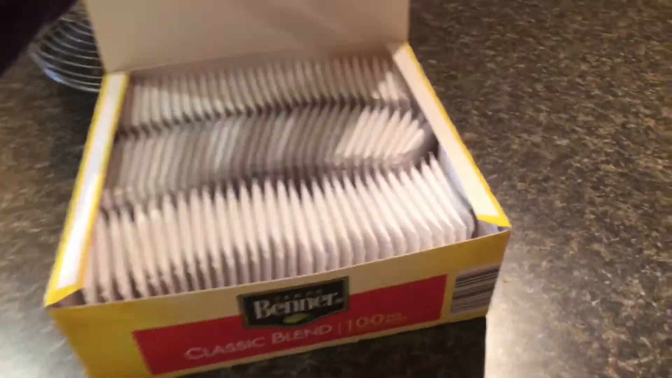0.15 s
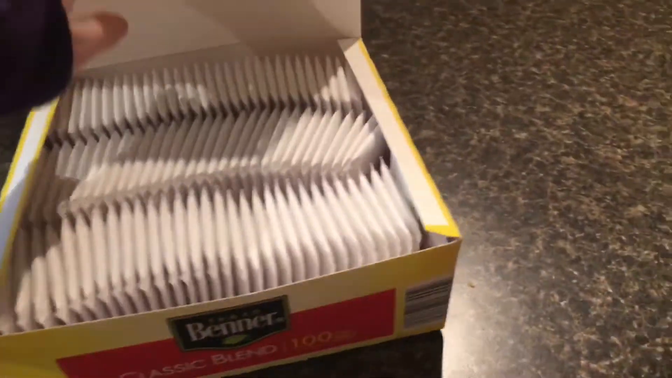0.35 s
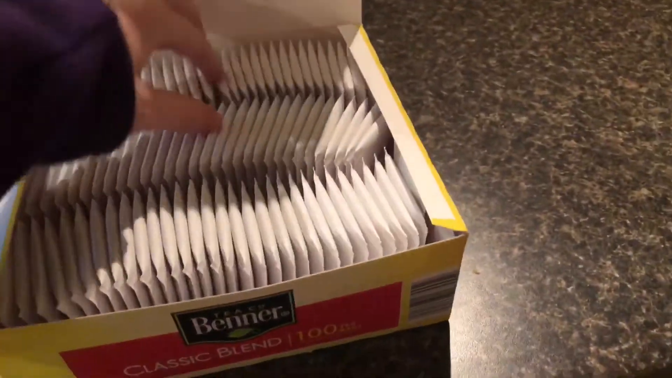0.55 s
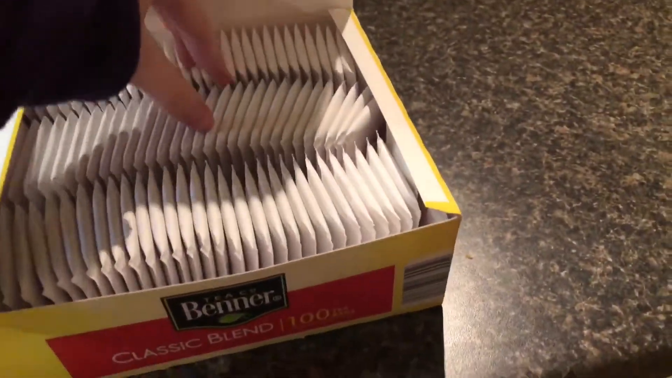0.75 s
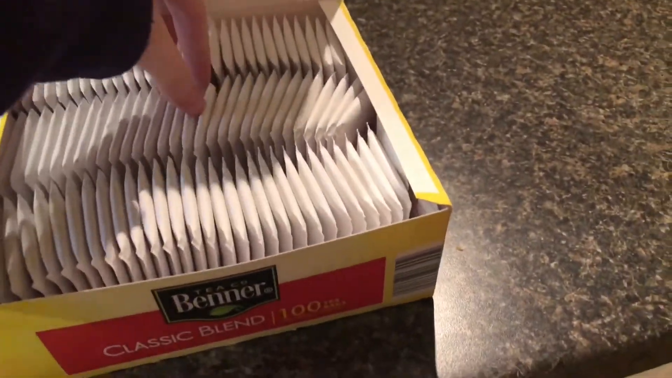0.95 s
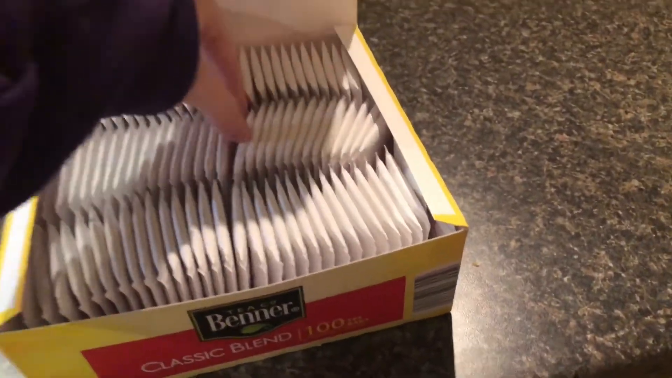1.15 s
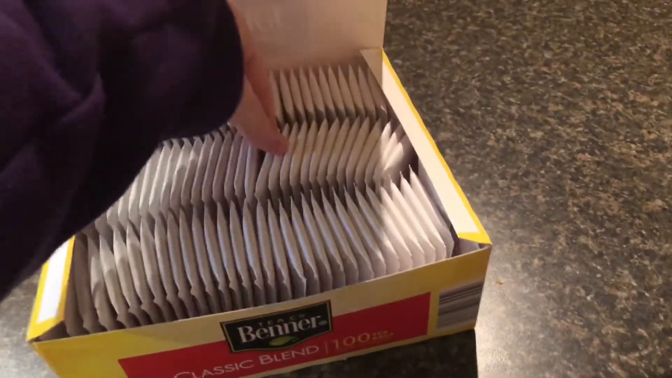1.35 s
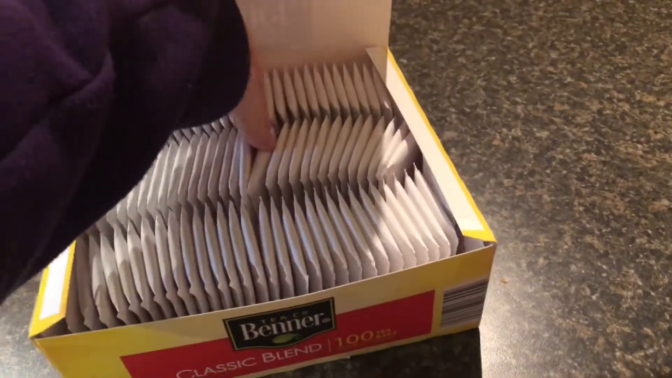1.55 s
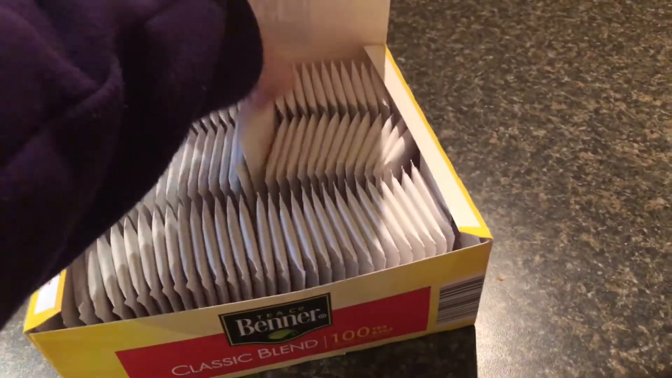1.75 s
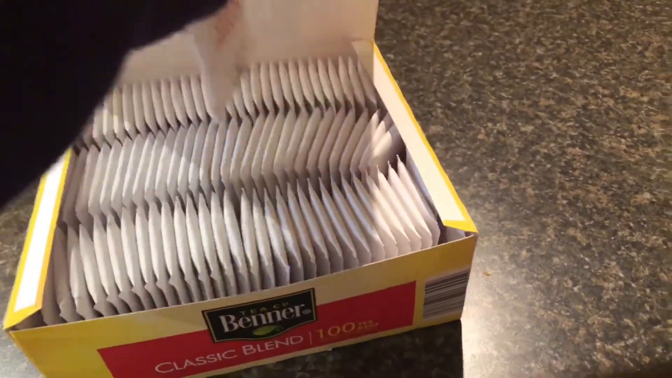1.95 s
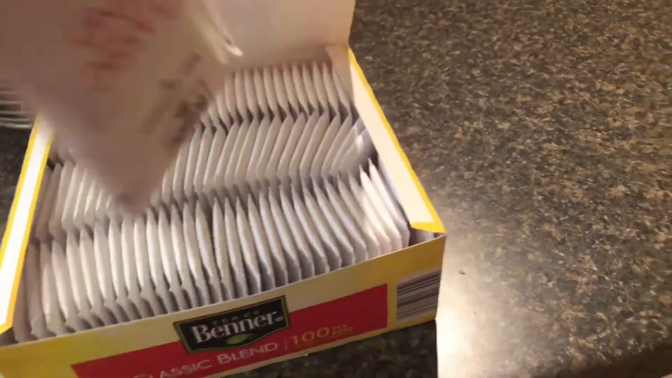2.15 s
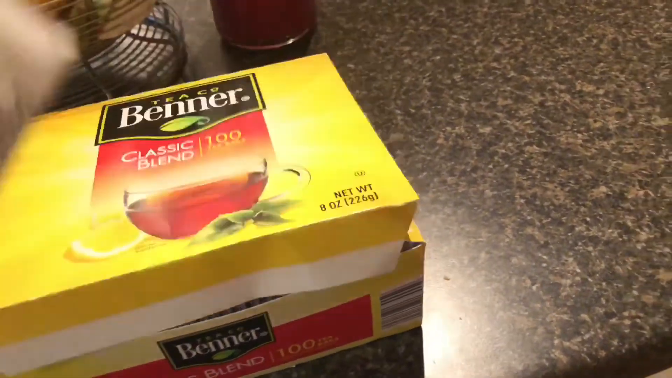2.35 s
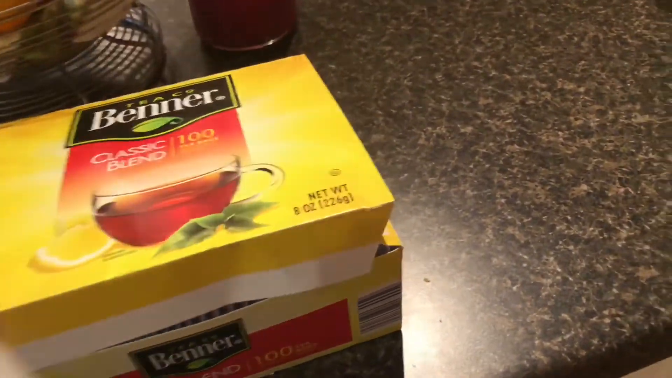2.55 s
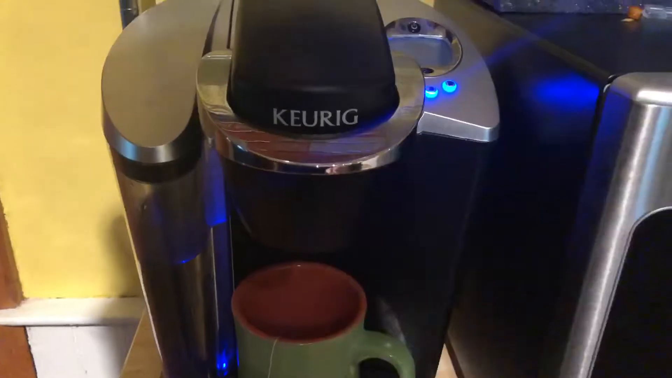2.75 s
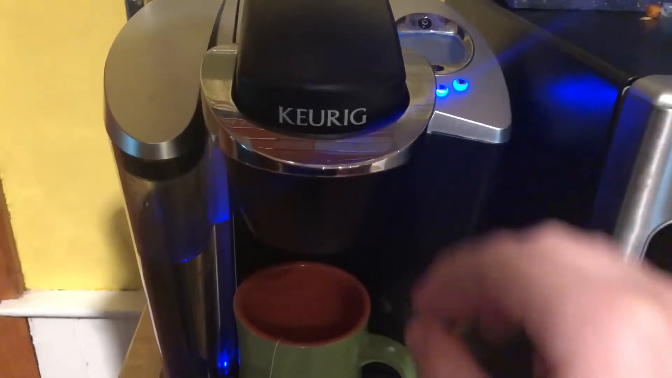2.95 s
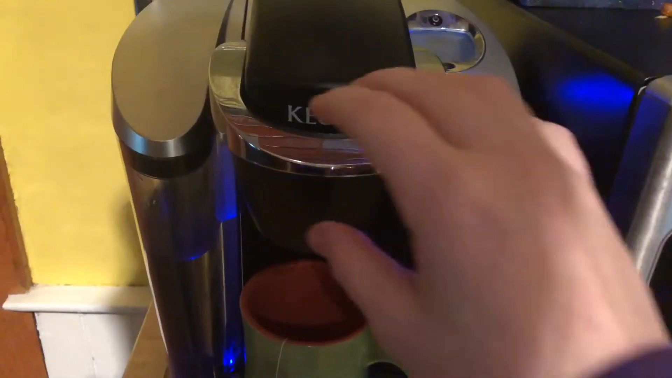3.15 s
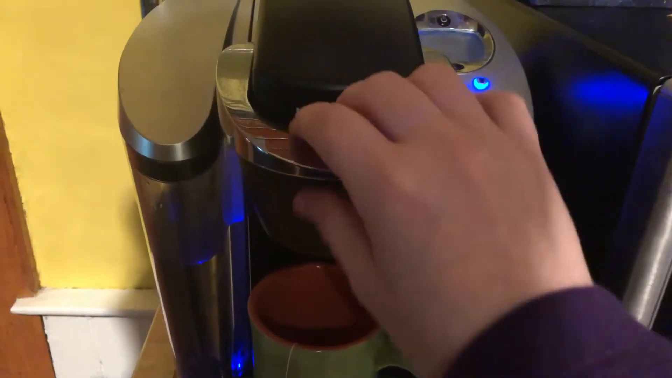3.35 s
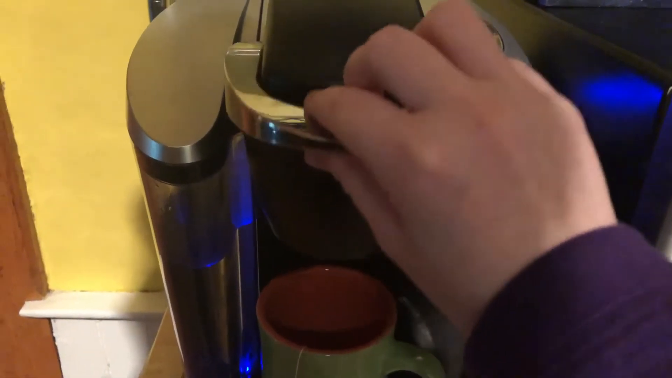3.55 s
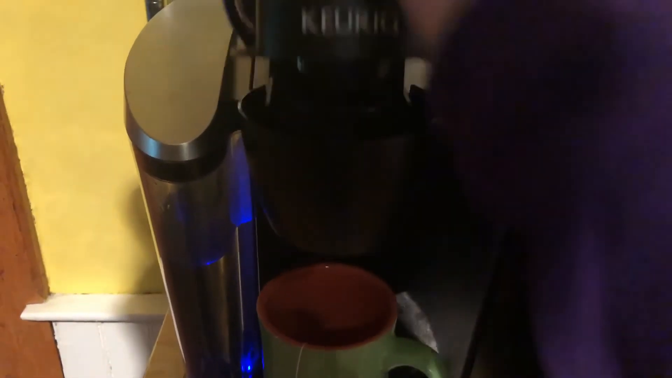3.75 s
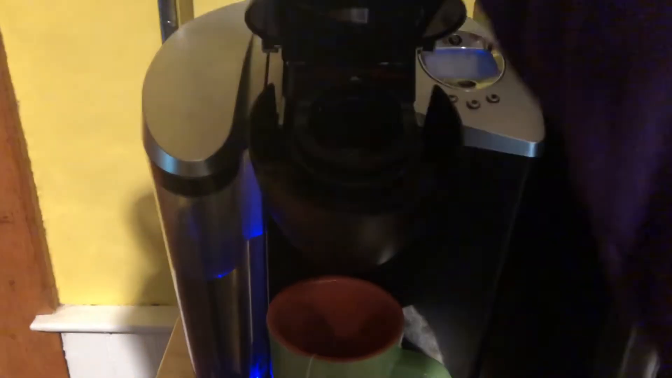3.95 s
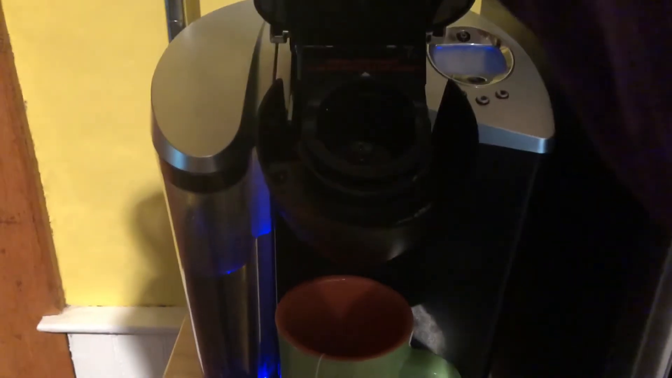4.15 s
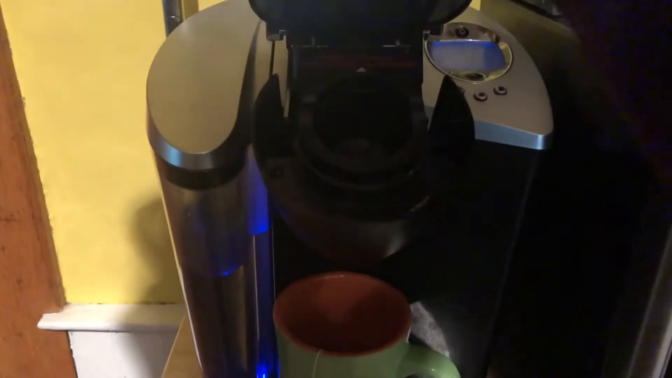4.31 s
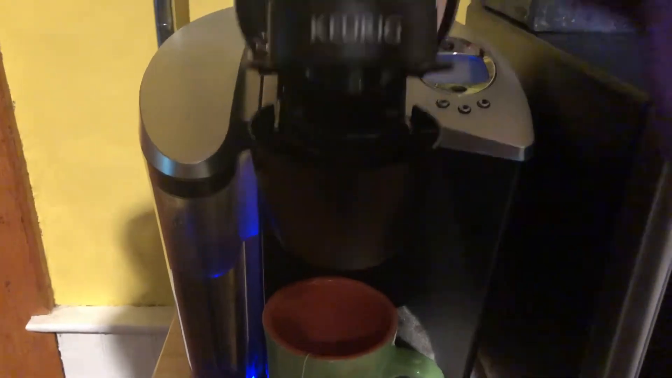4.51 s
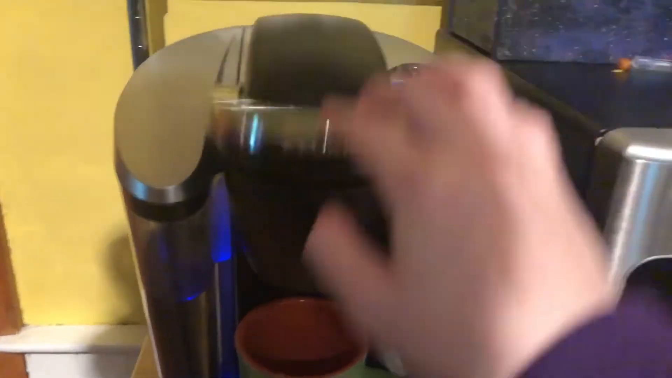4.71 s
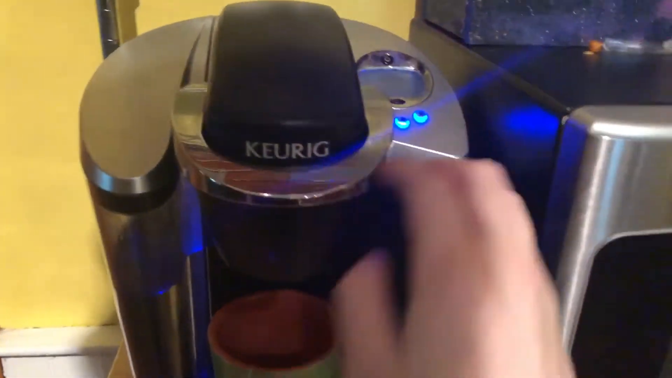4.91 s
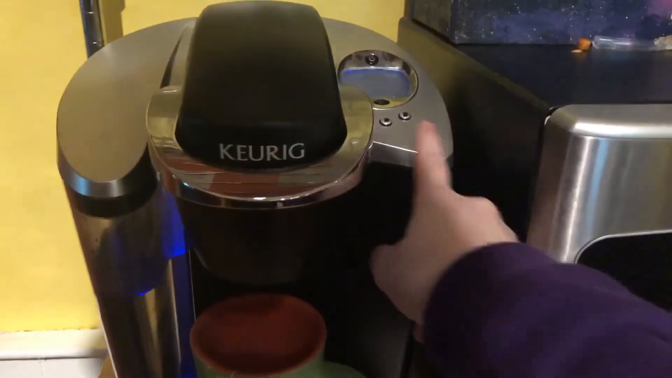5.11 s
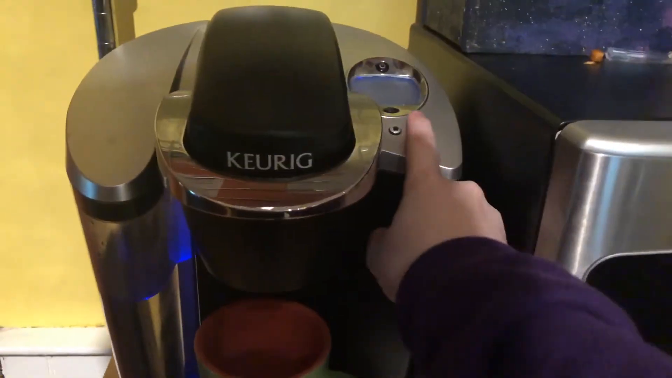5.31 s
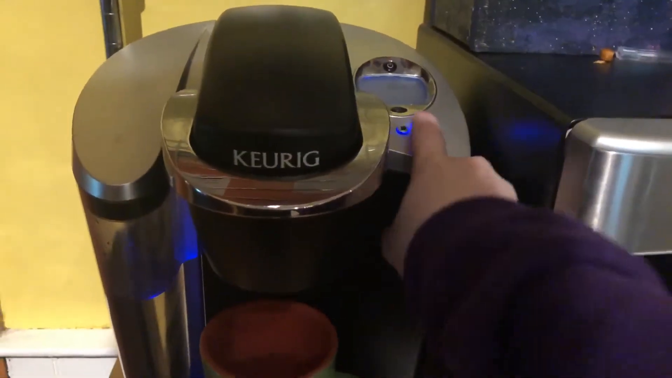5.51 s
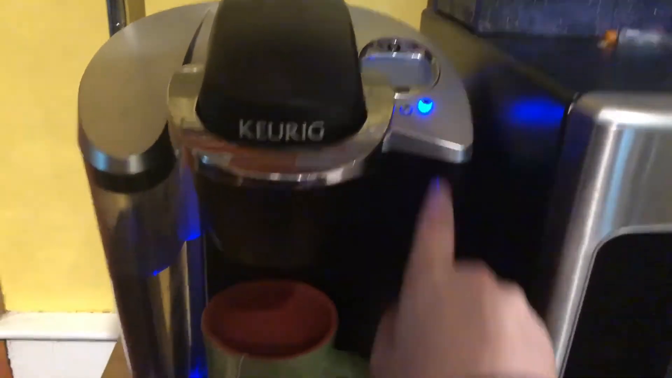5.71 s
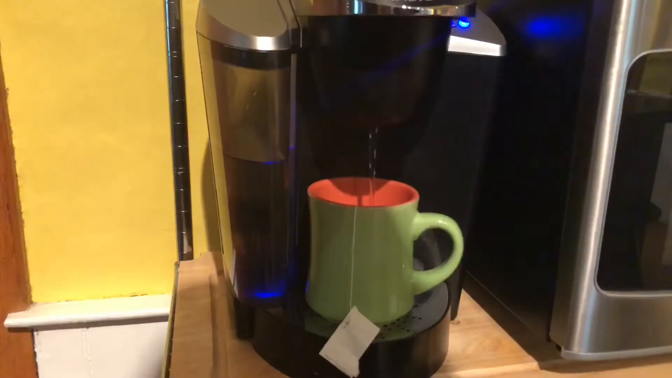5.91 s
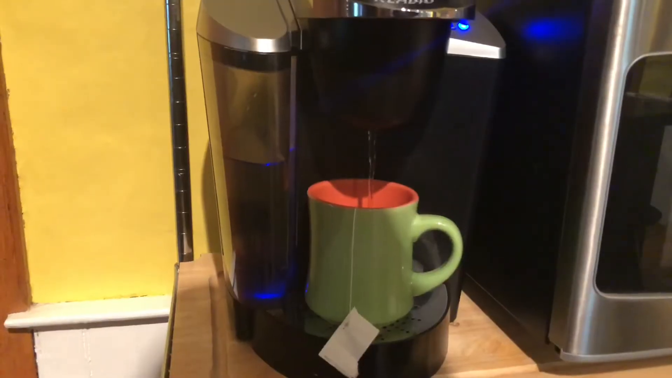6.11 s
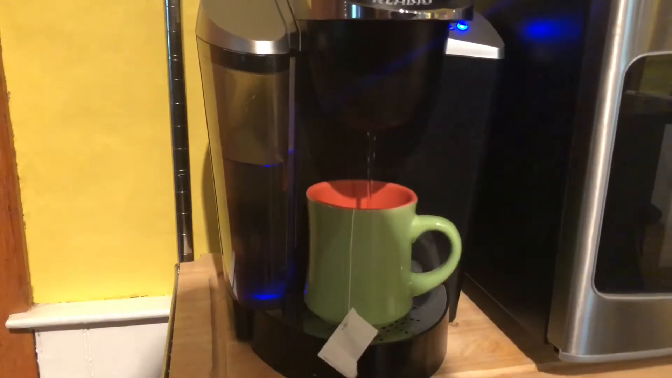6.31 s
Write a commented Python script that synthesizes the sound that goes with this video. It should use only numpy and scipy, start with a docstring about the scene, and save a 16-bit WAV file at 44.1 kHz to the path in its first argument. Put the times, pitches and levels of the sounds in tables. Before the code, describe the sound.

Fingers rustle crisply through paper tea bags in a card box, then a plastic coffee brewer clatters and slams shut, and water dribbles into a mug.

```python
"""In a kitchen, heard close up, fingers leaf through paper tea bags in a card box, pull one out and shut the lid.
After a cut, a plastic brewer's handle is lifted, lowered and slammed and a button pressed;
after a second cut, water dribbles into a mug while the pump hums.
Noise bursts and rubbing noise excite the resonances of box and brewer; drops are noise ticks and short sines.
Soft bumps, a short kitchen echo and steady air with appliance bands complete the sound."""
import sys
import numpy as np
from scipy import signal
from scipy.fft import rfft, irfft, next_fast_len
from scipy.io import wavfile
from scipy.ndimage import uniform_filter1d, map_coordinates

SR = 44100
rng = np.random.default_rng(int(sys.argv[2]) if len(sys.argv) > 2 else 0)


def generate_wav(signal):
    """Clip the signal to [-1, 1] and save it as 16-bit WAV at the path in sys.argv[1]."""
    frames = np.transpose(np.atleast_2d(signal))
    scaled = np.clip(frames, -1, 1) * 32767
    pcm = np.round(scaled).astype(np.int16)
    wavfile.write(sys.argv[1], SR, pcm)


N = 280917  # length in samples

# strokes of fingers on paper: start_s, length_s, rise_s, hiss_db, flap_hz, scrape_db, scrape_hz
PAPER_STROKES = [(0.186, 0.05, .008, -67, 5000, -72, 1500), (0.226, 0.12, 0.044, -54, 4440, -56, 1200),
                 (0.343, 0.19, 0.03, -53.5, 5070, -54.5, 1580), (0.5, .17, 0.043, -50, 4300, -46.5, 1760),
                 (0.675, 0.093, 0.024, -53.5, 4970, -62, 1480),
                 (0.777, 0.095, 0.045, -50, 5130, -52.5, 1300), (0.911, 0.074, 0.013, -53, 5500, -48, 2220),
                 (0.982, 0.091, 0.016, -50, 7200, -41, 890), (1.112, 0.067, 0.031, -52.5, 7200, -51.5, 720),
                 (1.163, 0.067, 0.056, -41, 7100, -48.5, 700), (1.255, 0.165, 0.0097, -55, 5700, -62, 1480),
                 (1.425, 0.072, .05, -49, 7700, -64, 1500), (1.511, 0.079, 0.013, -59, 7000, -65, 1500),
                 (1.573, .14, .04, -57.5, 3970, -59.5, 1630), (1.762, 0.23, 0.066, -43.5, 4330, -53, 2200),
                 (2.022, 0.043, 0.01, -51.5, 6000, -58, 1390), (2.095, 0.051, .008, -52.5, 3300, -42, 1300),
                 (2.32, 0.03, 0.0056, -58.5, 3930, -70, 2180)]
# the loudest paper snaps: start_s, peak_db, centre_hz
PAPER_SNAPS = [(0.7058, -38, 10200), (0.7423, -32, 4800), (0.9278, -40, 5500), (0.9455, -38, 8800),
               (1.0146, -17.5, 4700), (1.0331, -33, 6920), (1.1139, -19, 4040), (1.1506, -23, 6700),
               (1.1532, -26, 6150), (1.1729, -19, 6800), (1.1851, -21.5, 7000), (1.2145, -26, 7100),
               (1.232, -23, 6700), (1.2435, -22, 7400), (1.276, -31, 4630), (1.5508, -38, 4270),
               (1.594, -36.5, 4250), (1.975, -33, 6200), (2.0405, -32.5, 8130), (2.481, -37, 3850),
               (2.499, -37, 3520)]
# colour of the paper hiss: freq_hz, level_db (per Hz)
PAPER_COLOUR = [(530, -44.5), (900, 5), (1760, -7.5), (1910, -11), (2210, 1.5), (3270, 2), (4270, 1),
                (15200, -7.5), (15900, -10), (16500, -43.5)]
# card resonances under a finger: centre_hz, width_hz
CARD_SCRAPE = [(615, 350), (1410, 690), (1883, 590), (2280, 340)]
# resonances of the card box: centre_hz, width_hz, level_db
CARD_BOX = [(158, 23, -8), (236, 110, -1), (380.4, 37, 0.5), (475.7, 42, 0), (693, 61, 4), (950, 68, 0.5),
            (1172, 64, 0.5), (1336, 91, -1.5), (2340, 300, -10.5), (3030, 130, -21), (3550, 130, -15.5)]
# the box shifting: time_s, level_db
BOX_SWAY = [(0.0, -57), (0.19, -61.5), (0.49, -54), (0.83, -54.5), (1.19, -56), (1.53, -56), (1.75, -60.5),
            (2.08, -51), (2.27, -72.5), (2.44, -55.5)]
# knocks on the box: start_s, crack_db, knock_db, thump_db, crack_tilt_db (per octave, high in the treble)
BOX_KNOCKS = [(0.3253, -25.5, -22.5, -30, 4), (1.9834, -59, -66, -37, 0), (2.0574, -43, -34, -44, 0),
              (2.1077, -32, -42, -33, 6), (2.1263, -44, -46, -32, 23), (2.1396, -43, -38, -32, 5),
              (2.4441, -11, -6.5, -20, 3.5), (2.4502, -32.5, -11, -13, 5), (2.5372, -42, -22, -26, 0)]
# colour of the crack of a box knock: freq_hz, level_db (per Hz)
CARD_CRACK = [(880, -42.5), (1500, 3.5), (3000, -7), (3630, -1.5), (4300, -15.5), (5000, -10.5),
              (16500, -61.5)]
STROKE_STOP_S, REST_DB = 0.0098, -67  # dying-away time constant; faint rustle while the hand stays in the box
CRACKLES, CRACKLE_DB = 220, 7  # count of small chance snaps; typical peak over the hiss of the moment
CARD_CONTACT_S, PLASTIC_CONTACT_S = 0.0048, 0.008  # length scale of the chatter in a blow

# handle, hinge and fingers sliding: start_s, length_s, rise_s, hiss_db, rub_db
HANDLE_MOVES = [(3.324, 0.047, .02, -66, -69), (3.501, 0.043, .01, -46.5, -44),
                (3.591, 0.031, .01, -52, -47.5), (3.7, 0.029, .01, -72, -40),
                (3.763, 0.067, .02, -52, -46.5), (3.839, 0.057, .02, -47, -40.5),
                (3.89, 0.13, .02, -56.5, -46.5), (3.997, 0.23, .02, -75, -56), (4.237, 0.02, .02, -65, -57),
                (4.419, 0.16, .11, -44, -43.5), (4.59, 0.089, .01, -60, -46),
                (4.707, 0.31, .05, -65, -44.5), (5.155, 0.034, .005, -62.5, -52),
                (5.381, 0.14, .03, -87, -68), (5.652, 0.041, .015, -69, -63)]
# plastic contacts: start_s, crack_db, knock_db, thump_db, crack_tilt_db (per octave, high in the treble)
PLASTIC_CLACKS = [(3.5121, -28, -27.5, -38.5, 6), (3.535, -29, -40, -31, 11), (3.5496, -33, -46, -41, 0),
                  (3.5902, -34, -34, -39, -0.5), (3.6025, -29, -52, -29, 3), (3.6183, -24.5, -48, -48, 1.5),
                  (3.695, -27.5, -57, -59, 8.5), (3.792, -29, -26, -39, 2), (3.8445, -32, -40, -51, -6),
                  (3.8596, -28.5, -43, -50, -6.5), (3.8803, -22, -50, -57, -5), (3.8946, -26, -47, -28, -6),
                  (3.9962, -14.5, -19.5, -28, 3), (4.093, -36, -33, -66, -5), (4.1682, -45, -49, -44, -4),
                  (4.2087, -18, -16, -29, 9), (4.252, -24, -42, -30, -1.5), (4.266, -23, -27, -30, 10),
                  (4.2758, -23.5, -24, -26, 4.5), (4.3019, -22, -17, -23, -2),
                  (4.558, -28, -44.5, -43.5, -2), (4.5812, -35, -29.5, -41, -3.5),
                  (4.6193, -30.5, -41, -51.5, -10), (4.6456, -18, -23, -38, 2),
                  (4.6507, -15.5, -26, -25.5, -1), (4.7671, -24.5, -27, -49, 3.5),
                  (4.8221, -32.5, -43, -46, 1), (4.8335, -2.5, -3.5, -15.5, 0),
                  (4.8375, -9, -7.5, -12.5, 1), (4.8433, -15, -7.5, -9.5, -5), (4.876, -40.5, -27, -20, 0),
                  (5.1546, -29.5, -36.5, -46, 9), (5.32, -50, -44, -57, 2), (5.3518, -16, -19.5, -25, 14.5),
                  (5.459, -38, -27, -30, 4), (5.498, -38.5, -34, -37.5, 4.5),
                  (5.6507, -32, -42, -54, -12.5)]
# colour of the plastic crack: freq_hz, level_db (per Hz)
PLASTIC_CRACK = [(1180, -9.5), (2000, -2.5), (4350, -5.5), (5870, -11), (6470, -10.5), (12000, -19),
                 (13200, -20.5), (15500, -23), (16500, -19)]
# resonances of the brewer housing: centre_hz, width_hz, level_db
BREWER_SHELL = [(147, 28, -2.5), (186.4, 16, 1), (242, 30.6, 6), (356, 75, -4.5), (482, 106, -3),
                (731, 43, 0), (1053, 250, 0), (1392, 94, 2), (1610, 110, 0), (2015, 23, -1.5),
                (2320, 170, -1), (3116, 72, -8.5), (4500, 260, -10)]
# the hollow body booming under the hand: time_s, level_db
HOUSING_BOOM = [(3.35, -55.5), (3.45, -61), (3.55, -50), (3.68, -50), (3.96, -40), (4.17, -49),
                (4.33, -54.5), (4.61, -47), (4.85, -42), (5.04, -45), (5.16, -49), (5.54, -54), (5.7, -51)]
# mug and tray shaken by the housing: pitch_hz, level_db, t60_s
MUG_RINGS = [(1113, -4.5, 0.63), (1393, -2, 0.71), (1570, -12.5, .5), (1955, -1, 0.42)]
MOVE_STOP_S, MUG_DB = 0.01, -25.5  # dying-away time constant; peak of the mug relative to each knock
# hiss of the hinge: centre_hz, width_hz, level_db
HINGE_HISS = [(4070, 280, -4.0), (4250, 1500, 18), (5500, 400, -5.5), (6830, 900, -7.5), (11000, 6800, -14.0)]

# the clearest drops into the mug: start_s, splash_db, splash_hz, cavity_db
MUG_DROPS = [(5.8875, -52.5, 10900, -37.5), (5.9618, -49, 3120, -62), (5.9924, -61, 3090, -41.5),
             (6.0094, -59, 2620, -35), (6.0566, -46, 11300, -62.5), (6.1324, -61, 3000, -35.5),
             (6.146, -48, 4400, -38.5), (6.1719, -33.5, 8500, -26.5), (6.1874, -35.5, 10300, -27),
             (6.2144, -57, 9700, -37), (6.2682, -41.5, 3000, -43), (6.2836, -38, 8850, -35),
             (6.2924, -45, 4180, -33), (6.336, -43.5, 4200, -37), (6.3404, -40.5, 2930, -27),
             (6.3524, -49, 4100, -58)]
# colour of pump and trickle: freq_hz, level_db (per Hz)
STREAM_COLOUR = [(24, -32), (40, 8), (102, -23), (206, -1), (427, -8.5), (981, -3.5), (1330, -17),
                 (1580, -7), (2200, -24), (2970, -27), (6020, -35), (15300, -46), (16500, -46)]
STREAM_DB = -52  # rms
CAVITY_HZ, CAVITY_SCATTER = 898, 0.046  # air in the mug; share it varies from drop to drop
DROPLETS, DROPLET_DB, DROPLET_HZ = 24, -54, 3310  # small chance drops: count, typical level and splash pitch

# soft bumps of the hands through the worktop: start_s, peak_db, pitch_hz, t60_s
HAND_BUMPS = [(0.301, -40.5, 108, 0.26), (0.324, -33.5, 109, 0.14), (1.43, -48.5, 77.4, 0.14),
              (2.008, -42.5, 62, 0.12), (2.129, -49, 88, 0.083), (2.16, -42.5, 114, 0.15),
              (2.467, -36.5, 67, 0.14), (3.998, -42.5, 104, 0.26), (4.889, -34.5, 109.8, 0.1),
              (4.968, -41.5, 86.3, 0.15)]
# kitchen reverberation: freq_hz, t60_s
KITCHEN_DECAY = [(100, 1), (300, 0.34), (1000, 0.38), (3000, 0.51), (8000, 0.32), (15000, 0.29)]
ROOM_DB = -10, -10.5, -12.5  # kitchen echo sends of box, brewer, mug
BOX_ECHO_HZ = 2500  # the echo of the box is dull above this
# colour of the kitchen background: freq_hz, level_db (per Hz)
AIR_COLOUR = [(15, -29.5), (25, -29), (48, -1), (114, -9), (154, -2), (197, -4), (389, -9), (422, -8.5),
              (3060, -31), (3600, -30.5), (5570, -32.5), (7920, -36.5), (16500, -39.5)]
AIR_DB = -59  # rms, before a slow waver
# steady appliance bands: centre_hz, width_hz, level_db
APPLIANCE_BANDS = [(377.8, 12, -65), (1710, 33, -81.5), (3620, 110, -79.5), (7760, 400, -80.5)]
# joins between the scenes: time_s, fade_out_s, fade_in_s
SCENE_CUTS = [(2.8, 0.042, 0.04), (5.841, 0.03, 0.036)]
# response of the microphone: freq_hz, level_db
MICROPHONE_RESPONSE = [(20, -28.5), (35, -12), (55, -2.5), (15700, -1), (16100, -22.5), (16900, -31.5)]
TOP_HZ = 17000  # band limit of the microphone


def tea_bags():
    """Paper hisses and snaps, scrapes on card, and the box sways and knocks."""
    strokes = gestures(PAPER_STROKES, STROKE_STOP_S)
    hiss_db, flap_hz, scrape_db, scrape_hz = np.transpose(PAPER_STROKES)[3:]
    resting = amp(REST_DB) * during([PAPER_STROKES[1], PAPER_STROKES[-2]])
    hiss = amp(hiss_db) @ strokes + resting
    track = hiss * paper_hiss(flap_hz, strokes)
    track += amp(scrape_db) @ strokes * card_scrape(scrape_hz, strokes)
    sway = amp(curves(BOX_SWAY)[0]) * during(BOX_SWAY)
    track += sway * rubbing(modes(CARD_BOX, 0, 600), grain_db=3.5)
    add_snaps(track, hiss, flap_hz, strokes)
    return track + blows(BOX_KNOCKS, CARD_BOX, 550, CARD_CRACK, CARD_CONTACT_S)


def paper_hiss(flap_hz, strokes):
    """Broad friction noise plus the free flap, whose resonance moves as the fingers shorten it."""
    broad = rubbing(lambda hz: amp(along(PAPER_COLOUR, hz)) * hz ** 2 / (hz ** 2 + 3000 ** 2), grain_db=2.0)
    now = strokes.argmax(axis=0)  # the strongest stroke at each sample
    flaps = np.zeros(N)
    for centre_hz in (3300, 4500, 7200):
        nearness = np.exp(-(np.log(flap_hz / centre_hz) / 0.26) ** 2)
        resonance = sharp(modes([(centre_hz, 0.17 * centre_hz, 0)], 0, SR))
        flaps += nearness[now] * rubbing(resonance, grain_db=5.0)
    return 0.89 * broad + 0.34 * flaps


def card_scrape(scrape_hz, strokes):
    """Friction excites the card; the place of the finger favours some of its resonances."""
    friction = rubbing(lambda hz: np.ones_like(hz), grain_db=1.5)
    now = strokes.argmax(axis=0)
    scrape = np.zeros(N)
    for centre_hz, width_hz in CARD_SCRAPE:
        nearness = np.exp(-(np.log(scrape_hz / centre_hz) / 0.39) ** 2)
        resonance = sharp(modes([(centre_hz, width_hz, 0)], 0, SR))
        scrape += nearness[now] * unit(filtered(friction, resonance))
    return scrape


def add_snaps(track, hiss, flap_hz, strokes):
    """Paper snaps are noise flicks through a resonance; chance crackles follow the hiss level and flap pitch."""
    at = rng.integers(0, round(PAPER_STROKES[-1][0] * SR), CRACKLES)
    crackle_db = 20 * np.log10(hiss[at] + 1e-6) + CRACKLE_DB + rng.normal(0, 4.2, CRACKLES)
    crackle_hz = flap_hz[strokes.argmax(axis=0)[at]] * np.exp(rng.normal(0, 0.1, CRACKLES))
    t = np.arange(600) / SR
    for s, db, snap_hz in [*PAPER_SNAPS, *zip(at / SR, crackle_db, crackle_hz)]:
        flick = np.exp(-(t / 0.0011) ** 2) * (1 - np.exp(-t / 0.00026)) * rng.standard_normal(len(t))
        resonance = modes([(snap_hz, 1100, 0), (13500, 4000, -11)], 0, SR)
        add(track, s, filtered(flick, resonance), db)


def brewer():
    """The hinge hisses and rubs through the housing's modes between plastic clacks, which set the mug ringing faintly."""
    moves = gestures(HANDLE_MOVES, MOVE_STOP_S)
    hiss_db, rub_db = np.transpose(HANDLE_MOVES)[3:]
    track = amp(hiss_db) @ moves * rubbing(modes(HINGE_HISS, 0, SR), grain_db=3.5)
    track += amp(rub_db) @ moves * rubbing(sharp(modes(BREWER_SHELL, 600, 3000)), grain_db=4.0)
    boom = amp(curves(HOUSING_BOOM)[0]) * during(HOUSING_BOOM)
    track += boom * rubbing(modes(BREWER_SHELL, 0, 600), grain_db=2.0)
    add_mug_rings(track)
    return track + blows(PLASTIC_CLACKS, BREWER_SHELL, 600, PLASTIC_CRACK, PLASTIC_CONTACT_S)


def add_mug_rings(track):
    """Every clack shakes mug and tray: decaying sines with a soft onset and a slightly varying balance."""
    t = np.arange(SR // 2) / SR
    for s, _, knock_db, *_ in PLASTIC_CLACKS:
        ring = np.zeros(len(t))
        for hz, db, t60 in MUG_RINGS:
            decay = amp(db + rng.normal(0, 2) - 60 * t / t60)
            ring += decay * np.sin(2 * np.pi * (hz * t + rng.random()))
        add(track, s, ring * (1 - np.exp(-t / 0.003)), knock_db + MUG_DB)


def water():
    """Each drop splashes in the treble and rings the air in the mug, over pump and trickle noise."""
    start_s = SCENE_CUTS[1][0]
    stream = rubbing(lambda hz: amp(along(STREAM_COLOUR, hz)), grain_db=1.5)
    track = amp(STREAM_DB) * stream * (np.arange(N) > start_s * SR)
    when = rng.uniform(start_s, N / SR - .01, DROPLETS)
    a, b, c = rng.standard_normal((3, DROPLETS))
    droplets = zip(when, DROPLET_DB + 3 * a, DROPLET_HZ * np.exp(0.24 * b), DROPLET_DB + 4 * c)
    t = np.arange(1500) / SR
    for s, splash_db, splash_hz, cavity_db in [*MUG_DROPS, *droplets]:
        tick = np.exp(-(t / 0.0031) ** 2) * (1 - np.exp(-t / 0.00036)) * rng.standard_normal(len(t))
        splash = modes([(splash_hz, 0.06 * splash_hz, 0), (14500, 1500, -16)], 0, SR)
        add(track, s, filtered(tick, splash), splash_db)
        cavity_hz = CAVITY_HZ * np.exp(CAVITY_SCATTER * rng.standard_normal())
        cavity = np.sin(2 * np.pi * cavity_hz * t) * t * np.exp(-(t / 0.0017) ** 2)
        add(track, s, cavity, cavity_db)
    return track


def hands():
    """Soft contacts: a low swing that rises quickly but smoothly and soon dies."""
    track, t = np.zeros(N), np.arange(SR // 4) / SR
    for s, db, hz, t60 in HAND_BUMPS:
        swing = np.sin(2 * np.pi * hz * t) * amp(-60 * t / t60)
        add(track, s, swing * (1 - np.exp(-t / 0.0018)), db)
    return track


def blows(rows, body, split_hz, bright, contact_s):
    """Each contact is a blow and short chatter: a bright crack, the upper modes, a slower push into the low modes."""
    track, t = np.zeros(N), np.arange(SR // 8) / SR
    rise = 1 - np.exp(-t / np.array([[.001], [.001], [.003]]))
    lengths_s = np.clip(contact_s * np.array([[1], [1.2], [2.2]]), .001, .1)
    for s, crack_db, knock_db, thump_db, tilt_db in rows:
        force = np.exp(-(t / lengths_s) ** 2) * rise * rng.standard_normal((3, len(t)))
        force[1:] += 7 * np.exp(-((t - .0008) / 0.000094) ** 2)  # the single blow
        uneven = ripple(depth_db=2.0)
        crack = lambda hz: amp(along(bright, hz) + uneven(hz) + tilt_db * np.log2(1 + hz / 3000))
        add(track, s, filtered(force[0], crack), crack_db)
        add(track, s, filtered(force[1], modes(body, split_hz, SR)), knock_db)
        add(track, s, filtered(force[2], modes(body, 0, split_hz)), thump_db)
    return track


def rubbing(response, grain_db):
    """Noise of rms 1 broken into clumps, ticks and patches of colour, then sent through a body."""
    ticks = (rng.random(N) < 260 / SR) * amp(4.5 * np.minimum(rng.exponential(size=N), 2))  # about 260 a second
    clumps = amp(grain_db * (.7 * wobble(35) + .8 * wobble(300)))
    grains = clumps * (rng.standard_normal(N) + 1.4 * grain_db * ticks * rng.standard_normal(N))
    z = signal.stft(grains, nperseg=256)[2]
    # contact points shift, so different resonances light up for a few hundredths of a second
    patches = uniform_filter1d(rng.standard_normal(z.shape), size=4, axis=0)
    patches = uniform_filter1d(patches, size=7, axis=1)
    grains = signal.istft(z * amp(.85 * grain_db * unit(patches)), nperseg=256)[1][:N]
    return unit(filtered(grains, response))


def kitchen(x):
    """Hard walls scatter the sound into noise of the same colour; each frequency dies at its own speed."""
    hop = 128
    frames = dict(fs=SR, nperseg=512, noverlap=512 - hop)
    hz, _, z = signal.stft(x, **frames)
    power = np.abs(z) ** 2
    power = np.where(hz[:, None] > 2000, uniform_filter1d(power, size=4, axis=0), power)
    keep = amp(-120 * hop / SR / along(KITCHEN_DECAY, hz))  # power kept from frame to frame
    # the walls answer about 9 ms after the sound
    held = np.array([signal.lfilter([0, 0, 0, 1 - k], [1, -k], p) for k, p in zip(keep, power)])
    scatter = signal.stft(rng.standard_normal(N), **frames)[2]
    scatter /= np.sqrt(np.mean(np.abs(scatter) ** 2))
    return signal.istft(np.sqrt(np.abs(held)) * scatter, **frames)[1][:N]


def background():
    """Gently wavering air noise with a few steady, narrow appliance bands."""
    air = unit(filtered(rng.standard_normal(N), lambda hz: amp(along(AIR_COLOUR, hz))))
    track = amp(AIR_DB + 0.46 * wobble(3.7)) * air
    for centre_hz, width_hz, db in APPLIANCE_BANDS:
        band = filtered(rng.standard_normal(N), modes([(centre_hz, width_hz, 0)], 0, SR))
        track += amp(db) * unit(band)
    return track


def amp(db):
    """Decibels to gain."""
    return 10 ** (np.asarray(db) / 20)


def unit(x):
    """Scaled to rms 1."""
    return x / np.sqrt(np.mean(x ** 2) + 1e-20)


def along(points, hz):
    """Values of (Hz, value) points, read on a log frequency axis."""
    f, v = np.transpose(points)
    return np.interp(np.log(hz + 1), np.log(f + 1), v)


def wobble(rate):
    """A smooth random curve, rate knots a second."""
    return map_coordinates(rng.standard_normal(int(N * rate / SR) + 4), [np.arange(N) * rate / SR])


def filtered(x, response):
    """x sent through a complex response of frequency."""
    m = next_fast_len(len(x) + 8192)
    return irfft(rfft(x, m) * response(np.fft.rfftfreq(m, 1 / SR)), m)[:len(x)]


def modes(table, lo_hz, hi_hz):
    """Causal response of the resonances between two frequencies, with alternating signs."""
    return lambda f: sum((-1) ** k * amp(db) * 1j * f * abs(w) / (c * c - f * f + 1j * f * abs(w))
                         for k, (c, w, db) in enumerate(table) if lo_hz <= c < hi_hz)


def sharp(response):
    """A resonance passed twice, so the valleys stay dark."""
    return lambda hz: response(hz) ** 2


def ripple(depth_db):
    """Uneven colour of one contact: random peaks and dips about a kilohertz apart."""
    knots = depth_db * rng.standard_normal(20)
    return lambda hz: np.interp(hz, np.linspace(0, SR / 2, len(knots)), knots)


def gestures(rows, stop_s):
    """Envelope of each row: a rise, a hold, a quick dying away."""
    t = np.arange(N) / SR
    return np.array([np.clip((t - s) / rise, 0, 1) ** 2 * np.exp(-np.clip(t - s - length, 0, 1) / stop_s)
                     for s, length, rise, *_ in rows])


def curves(rows):
    """One value per sample for each column after the time; the ends hold."""
    s, *cols = np.transpose(rows)
    return [np.interp(np.arange(N) / SR, s, c) for c in cols]


def during(rows):
    """1 from the first row's time to the last row's, else 0."""
    t = np.arange(N) / SR
    return (t > rows[0][0]) & (t < rows[-1][0])


def add(track, s, sound, db):
    """Mix a sound into the track at a time and peak level."""
    part = track[round(s * SR):][:len(sound)]
    part += amp(db) * sound[:len(part)] / np.abs(sound).max()


def scene():
    """Three scenes in the kitchen joined by short fades through silence."""
    box, machine, mug = tea_bags(), brewer(), water()
    dull_box = filtered(box, lambda hz: 1 / (1 + 1j * hz / BOX_ECHO_HZ))
    echo = kitchen(amp(ROOM_DB) @ [dull_box, machine, mug])
    mix = box + machine + mug + echo + hands() + background()
    for s, fade_out, fade_in in SCENE_CUTS:
        mix *= np.interp(np.arange(N) / SR, [s - fade_out, s, s + fade_in], [1, 0, 1])
    return mix[None]


def record(dry):
    """The microphone rolls off at both ends and keeps nothing above its band limit."""
    return filtered(dry[0], lambda hz: amp(along(MICROPHONE_RESPONSE, hz)) * (hz < TOP_HZ))[None]


dry = scene()
out = record(dry)
generate_wav(out)
```